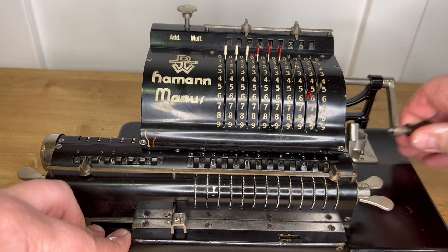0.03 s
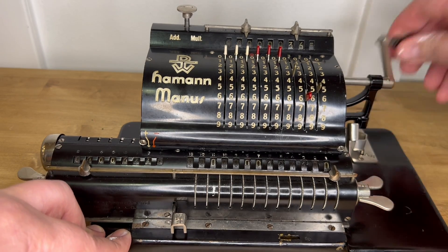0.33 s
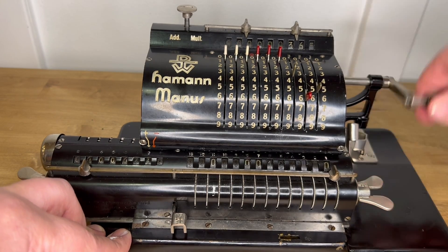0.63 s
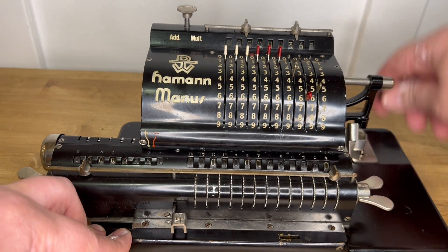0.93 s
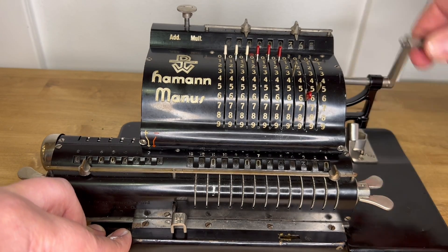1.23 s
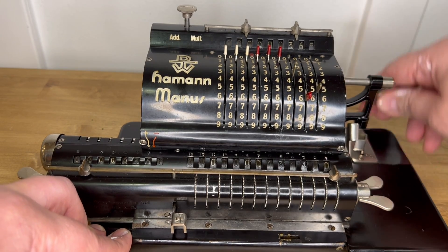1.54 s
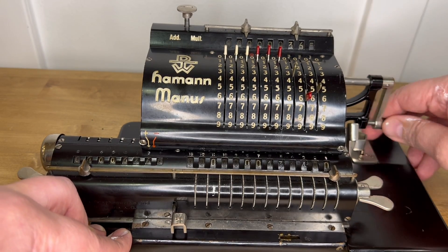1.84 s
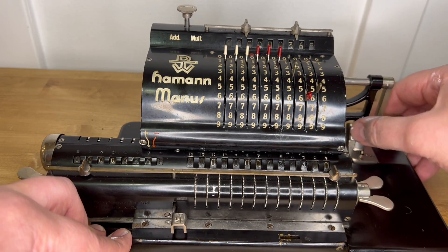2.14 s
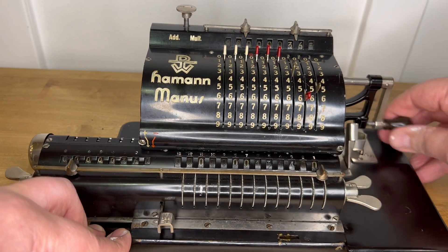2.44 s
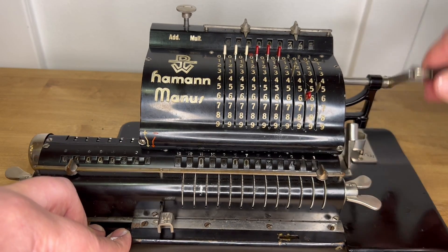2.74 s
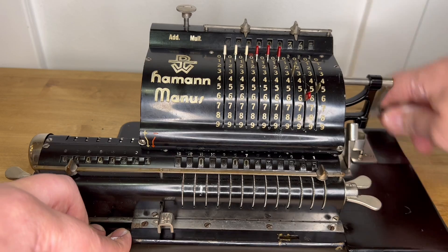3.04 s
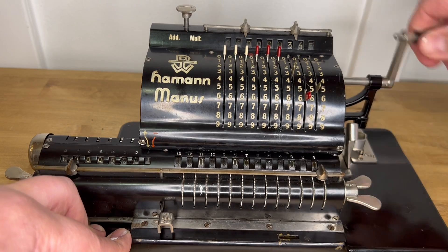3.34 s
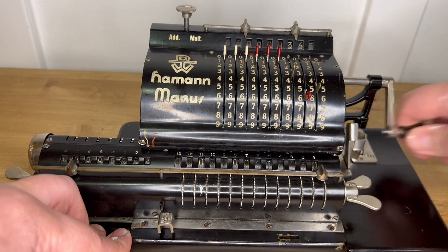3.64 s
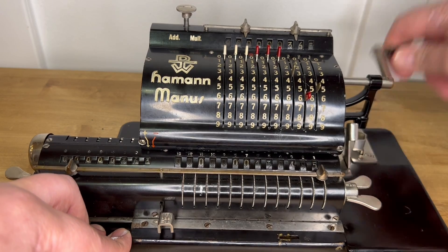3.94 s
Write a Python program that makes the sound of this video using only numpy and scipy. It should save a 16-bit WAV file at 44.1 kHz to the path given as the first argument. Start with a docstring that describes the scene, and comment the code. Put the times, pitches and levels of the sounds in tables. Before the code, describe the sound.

Close up in a small quiet room, a mechanical calculator is cranked three times, gears chattering and case humming. The carriage shifts with a clunk, and three more rattling turns follow, with light ticks and rubs between them.

```python
"""Six rattling turns of a hand-cranked calculator, close by, on a wooden table in a small quiet room.
In each turn the gears chatter, pawls (small catches) snap over the digit wheels and the case hums.
Between turns the crank swings on with a light rub and ticks.
After the third turn the carriage (the sliding part) moves one place and stops with a clunk."""
import sys
import numpy as np
from scipy import signal
from scipy.fft import rfft, irfft, next_fast_len
from scipy.io import wavfile
from scipy.ndimage import uniform_filter1d

SR = 44100
rng = np.random.default_rng(int(sys.argv[2]) if len(sys.argv) > 2 else 0)


def generate_wav(signal):
    """Clip the signal to [-1, 1] and save it as 16-bit WAV at the path in sys.argv[1]."""
    frames = np.transpose(np.atleast_2d(signal))
    scaled = np.clip(frames, -1, 1) * 32767
    pcm = np.round(scaled).astype(np.int16)
    wavfile.write(sys.argv[1], SR, pcm)


N = 176400
T = np.arange(N) / SR

# Levels are relative. A fade_s is the time a sound takes to drop by 60 dB.
# crank turns: start_s, rattle_db, case_push_db, push_length_s, coast_db
TURNS = [(0.122, -39.5, -45.5, 0.18, -45.5), (0.637, -39.5, -40.5, 0.11, -53), (1.13, -39, -40.5, .12, -63),
         (2.685, -40.5, -46.5, 0.13, -48.5), (3.209, -40, -43, 0.21, -52), (3.715, -40.5, -43, 0.09, -61)]
# the tens carry running through the wheels after a turn: start_s, length_s, rattle_db
CARRIES = [(0.258, 0.037, -39), (1.268, 0.035, -38), (3.342, 0.062, -39.5)]
# pawls snapping over the digit wheels: start_s, level_db
PAWL_SNAPS = [(0.122, -32), (0.1396, -33.2), (0.1565, -29.3), (0.1737, -31.0), (0.1887, -30.6),
              (0.2137, -29.7), (0.2358, -29.9), (0.2575, -32), (0.2634, -26.7), (0.2735, -29.1),
              (0.281, -29.8), (0.2959, -25.4), (0.6415, -33), (0.6478, -32.9), (0.6573, -30.6),
              (0.6731, -30.4), (0.7008, -29.9), (0.7225, -30.7), (0.7477, -31.6), (1.1345, -31),
              (1.1399, -29.3), (1.1473, -26.6), (1.1619, -30.5), (1.1956, -30.9), (1.2189, -29.6),
              (1.2404, -28.6), (1.259, -29), (1.2642, -25.9), (1.2729, -26.4), (1.2853, -27.1),
              (1.2966, -28.7), (1.3078, -29.1), (1.3191, -30.0), (2.6857, -32.9), (2.7067, -32.4),
              (2.7271, -33.5), (2.7472, -33.1), (2.765, -30.1), (2.7874, -30.6), (2.812, -32.7),
              (3.2112, -31.5), (3.2182, -30.8), (3.2285, -28.2), (3.246, -28.9), (3.2669, -30.5),
              (3.2863, -27.9), (3.3048, -28.6), (3.3121, -30.6), (3.3273, -30.4), (3.347, -26.9),
              (3.3518, -26.3), (3.3625, -26.8), (3.3749, -24.5), (3.386, -28.3), (3.395, -30),
              (3.4046, -28.6), (3.7185, -33), (3.724, -30.2), (3.7335, -31.2), (3.7485, -31.6),
              (3.7656, -32.1), (3.8069, -31.7), (3.828, -31.4)]
# light ticks of the ratchet and catches: start_s, level_db
RATCHET_TICKS = [(.458, -42), (.5605, -34), (.863, -39), (1.0705, -33.5), (2.2935, -35.5), (2.558, -46),
                 (2.926, -36.5), (3.139, -35), (3.5905, -32), (3.65, -37), (3.932, -43)]
# tones the case rings at: pitch_hz, shaken_db, struck_db, free_fade_s
CASE_TONES = [(128.2, -15.5, -6.5, 0.35), (204.1, -3, -1, 0.37), (236.2, -6.5, 1, 0.13),
              (367.6, -6.5, -0.5, 0.59), (493.6, -22.5, -3.5, 0.23), (575, -11, -7, 0.3),
              (890, -9.5, -15, 0.072), (1053.4, -10.5, -11.5, 0.21), (1204, -18, -5, 0.13),
              (1484.5, -7, -3, 0.068)]
# bright rubs of sliding metal, from the crank swinging free and the carriage starting to slide:
# start_s, level_db, rise_s, fade_s
METAL_RUBS = [(0, -64.5, 0.03, 0.44), (.465, -45, 0.046, 0.2), (.988, -44, 0.042, 0.098),
              (1.648, -45.5, 0.0092, 0.021), (2.202, -44, 0.011, 0.51), (2.592, -62, 0.012, 0.2),
              (3.055, -46, 0.032, 0.22), (3.562, -43, 0.037, 0.13)]
# duller scrapes of the handle: start_s, level_db, rise_s, fade_s
HANDLE_SCRAPES = [(1.652, -46.5, 0.0094, 0.079), (1.739, -51.5, 0.018, 0.15)]
# tones of the free crank arm: pitch_hz, level_db, fade_s
ARM_TONES = [(2090, 0.5, .13), (2288, -10.5, .15)]
# tones of the handle dropping into its seat: pitch_hz, level_db, fade_s
HANDLE_TONES = [(622, 4, 0.066), (886, -3, 0.075), (1530, -3.5, 0.11)]
# the shift lever's soft knock: start_s, level_db, pitch_hz, fade_s
LEVER_KNOCKS = [(2.18, -31.5, 140, 0.024)]
# tone colour (how strong each pitch is) of the steel teeth: pitch_hz, level_db
TEETH_COLOUR = [(40, -26.5), (100, -3), (300, 3), (1450, 0), (1750, -5.5), (2750, 2.5), (3700, -5.5),
                (5200, 0), (10500, -6), (15500, -13)]
# tone colour of the pawls and wheels: pitch_hz, level_db
PAWL_COLOUR = [(150, -13), (1800, -2), (2750, 1.5), (10500, -1), (15500, -8)]
# tone colour of the bright metal rubs: pitch_hz, level_db
RUB_COLOUR = [(60, -20.5), (300, 1), (1300, -5.5), (2100, 0), (3200, -2.5), (11300, -6), (15500, -18)]
# tone colour of the scraping handle: pitch_hz, level_db
SCRAPE_COLOUR = [(150, -15), (620, 11), (1100, -3.5), (1550, -2), (2000, 1), (11000, 1.5), (15500, -10)]
# tone colour of the carriage: pitch_hz, level_db
CARRIAGE_COLOUR = [(40, -56), (90, -3.5), (250, 0), (620, 3.5), (900, -7), (1550, -5.5), (1850, -12.5),
                   (2800, -10), (9000, -17.5), (15500, -37)]
# tone colour of the room's background: pitch_hz, level_db
BACKGROUND_COLOUR = [(25, -28.5), (310, -7.5), (600, -24.5), (3000, -24.5), (15500, -58.5)]
# how long the room echoes: pitch_hz, fade_s
ROOM_FADES = [(100, 0.55), (400, 0.58), (3000, 0.29), (13000, 0.15)]

MESH_S, MESH_RISE_S, MESH_FADE_S = 0.11, 0.0092, 0.08  # the teeth gripping in each turn
SLIDE_START_S, CARRIAGE_STOP_S = 2.218, 2.3128


def gear_rattle():
    """Loose gears take up their slack, then the teeth rattle through each turn and each tens carry."""
    slack_s, slack_db = 0.02, -10
    level = np.zeros(N)
    for start_s, rattle_db, *_ in TURNS:
        t = T - start_s
        slack = amp(slack_db) * ramp(t + slack_s, slack_s) * (t < MESH_RISE_S)
        level += amp(rattle_db) * (slack + pulse(t, MESH_RISE_S, MESH_S, MESH_FADE_S))
    for start_s, length_s, rattle_db in CARRIES:
        level += amp(rattle_db) * pulse(T - start_s, MESH_RISE_S, length_s, MESH_FADE_S)
    return colour(chatter(level, hits_per_s=1500, scatter_db=4.5, fade_s=0.008), TEETH_COLOUR)


def pawls_and_wheels():
    """Pawls snap, the ratchet ticks and the wheels coast after each turn; small steel parts ring along."""
    coasting = sum(amp(db) * fade(T - start_s - MESH_S, 0.79) for start_s, *_, db in TURNS)
    wheels = chatter(coasting, hits_per_s=430, scatter_db=6, fade_s=0.0072)
    snaps = amp(-1) * clicks(PAWL_SNAPS, rise_s=0.00093, hold_s=0.0013, fade_s=0.02, tint_db=2.5)
    ticks = amp(-2) * clicks(RATCHET_TICKS, rise_s=0.0008, hold_s=0.00096, fade_s=0.014, tint_db=3)
    return colour(steel_ring(snaps + ticks + wheels, fade_s=0.026, share=0.27), PAWL_COLOUR)


def case_hum():
    """The gears shake the case with a rough push and the main gear's wavering tone."""
    tooth_hz, waver_hz, tooth_db = 203.6, 7.46, -27.5
    push, tone_level = np.zeros((2, N))
    for start_s, _, push_db, length_s, _ in TURNS:
        t = T - start_s
        push += amp(push_db) * pulse(t, 0.017, length_s, fade_s=0.17)
        tone_level += amp(push_db + tooth_db) * pulse(t, 0.03, length_s, fade_s=0.17)
    pitch_hz = tooth_hz + waver_hz * unit(uniform_filter1d(noise(), size=600))
    tone = np.sin(2 * np.pi * np.cumsum(pitch_hz) / SR)
    return held_case(push * noise() + tone_level * tone)


def held_case(force):
    """The shaken case rings, and the hands on it cut the ringing a little shorter."""
    held_share = 0.76
    return shaken(force, [(hz, db, fade_s * held_share) for hz, db, _, fade_s in CASE_TONES])


def carriage_stop():
    """The carriage hits its stop: loose parts crash and the case rings. Returns the two apart."""
    t = T - CARRIAGE_STOP_S
    blow = amp(-22) * noise() * pulse(t, rise_s=0.0013, hold_s=0.004, fade_s=0.029)
    ring = struck(t, [(hz, db, fade_s) for hz, _, db, fade_s in CASE_TONES])
    return colour(blow, CARRIAGE_COLOUR), amp(-31) * ring * ramp(t, 0.0057)


def carriage_slide():
    """The lever creaks, then the carriage hisses along its rail and shakes the case."""
    lever_start_s = 2.137
    before_stop = T < CARRIAGE_STOP_S
    creak = amp(-61.5) * (T > lever_start_s) * before_stop
    moving = ramp(T - SLIDE_START_S, 0.02) * before_stop
    hiss = colour((creak + amp(-44.5) * moving) * noise(), CARRIAGE_COLOUR)
    return hiss + held_case(amp(-45) * moving * noise())


def lever_knock():
    """The shift lever knocks softly: a low tone that dies after a few cycles."""
    out = np.zeros(N)
    for start_s, db, hz, fade_s in LEVER_KNOCKS:
        t = T - start_s
        out += ramp(t, 1 / hz) * struck(t, [(hz, db, fade_s)])
    return out


def rubs_and_handle():
    """Crank and carriage rub with a faint ring; once, the handle scrapes and knocks into its seat."""
    seat_s = 1.661
    rub = rubbing(METAL_RUBS, RUB_COLOUR, scatter_db=4)
    arm_ring = amp(-27.5) * shaken(rub, ARM_TONES)
    scrape = rubbing(HANDLE_SCRAPES, SCRAPE_COLOUR, scatter_db=1.5)
    knock = amp(-48) * ramp(T - seat_s, 0.0034) * struck(T - seat_s, HANDLE_TONES)
    return rub + arm_ring + scrape + knock


def chatter(level, hits_per_s, scatter_db, fade_s):
    """Teeth meet at random moments, each making a dry click of noise of its own size."""
    hits = random_hits(hits_per_s, scatter_db)
    energy = signal.fftconvolve(hits ** 2, fade(T[:SR // 20], fade_s) ** 2)[:N]
    return level * unit(np.sqrt(np.abs(energy))) * noise()


def clicks(rows, rise_s, hold_s, fade_s, tint_db):
    """Metal taps metal: one burst of noise per row, each with its own random tint of tone colour."""
    out, t = np.zeros(N + SR), T[:SR // 16]
    hz = np.fft.rfftfreq(len(t), 1 / SR)
    for start_s, db in rows:
        tint = rng.standard_normal(28)
        gain = amp(tint_db * np.interp(hz, np.linspace(0, SR / 2, len(tint)), tint))
        burst = unit(irfft(rfft(rng.standard_normal(len(t))) * gain, len(t)))
        out[round(start_s * SR):][:len(t)] += amp(db) * burst * pulse(t, rise_s, hold_s, fade_s)
    return out[:N]


def rubbing(rows, tone_colour, scatter_db):
    """Sliding metal makes thousands of tiny bumps that bite, swell and die away."""
    bite = 0.25  # share of the full rub heard at first touch
    level = np.zeros(N)
    for start_s, db, rise_s, fade_s in rows:
        t = T - start_s
        swell = bite + (1 - bite) * ramp(t, rise_s) ** 2
        level += amp(db) * (t > 0) * swell * fade(np.maximum(t - rise_s, 0), fade_s)
    bumps = unit(random_hits(hits_per_s=7000, scatter_db=scatter_db) * rng.choice([-1, 1], N))
    return colour(steel_ring(level * bumps, fade_s=0.034, share=0.33), tone_colour)


def steel_ring(sound, fade_s, share):
    """Many small steel parts add a short, dense ring, which changes as they move."""
    t, out, step = T[:SR // 8], np.zeros(N + SR), SR // 25
    for start in range(0, N, step):
        tail = rng.standard_normal(len(t)) * fade(t, fade_s)
        ring = signal.fftconvolve(sound[start:start + step], tail / np.linalg.norm(tail))
        out[start:start + len(ring)] += ring
    return np.sqrt(1 - share) * sound + np.sqrt(share) * out[:N]


def shaken(force, tones):
    """A part rings at its own tones while a force keeps shaking it."""
    t, response = T[:SR], np.zeros(SR)
    for k, (hz, db, fade_s) in enumerate(tones):
        ring = (-1) ** k * np.cos(2 * np.pi * hz * t) * fade(t, fade_s)
        response += amp(db) * ring / np.linalg.norm(ring)
    return signal.fftconvolve(force, response)[:N]


def struck(t, tones):
    """A part rings at its own tones after one blow at t = 0."""
    return sum((-1) ** k * amp(db) * np.sin(2 * np.pi * hz * t) * fade(t, fade_s)
               for k, (hz, db, fade_s) in enumerate(tones))


def room_echo(sound):
    """A short, smooth room echo, drawn afresh for each stretch so no pitch rings out."""
    build_up_s = 0.0085
    out, step = np.zeros(N + SR), SR // 14
    for start in range(0, N, step):
        hz, t, bands = signal.stft(rng.standard_normal(SR * 3 // 4), SR, nperseg=256)
        bands *= fade(t, value_at(ROOM_FADES, hz)[:, None])  # high pitches die sooner
        tail = signal.istft(bands, SR, nperseg=256)[1]
        tail *= ramp(T[:len(tail)], build_up_s)
        echo = signal.fftconvolve(sound[start:start + step], tail / np.linalg.norm(tail))
        out[start:start + len(echo)] += echo
    return out[:N]


def background():
    """The quiet room has a faint, low, steady hush."""
    return amp(-78) * colour(noise(), BACKGROUND_COLOUR)


def amp(db):
    """Turn decibels into a number to multiply by."""
    return 10 ** (np.asarray(db) / 20)


def unit(sound):
    """Scale a sound to an average power of 1."""
    return sound / np.sqrt(np.mean(sound ** 2) + 1e-20)


def value_at(points, hz):
    """Read between the rows of a (pitch_hz, value) table, with octaves evenly spaced."""
    pitches, values = np.transpose(points)
    return np.interp(np.log(hz + 1), np.log(pitches + 1), values)


def fade(t, fade_s):
    """Start at t = 0 and drop by 60 dB every fade_s."""
    return (t >= 0) * amp(-60 * np.maximum(t, 0) / fade_s)


def ramp(t, rise_s):
    """A straight rise from 0 to 1."""
    return np.clip(t / rise_s, 0, 1)


def pulse(t, rise_s, hold_s, fade_s):
    """Rise, hold until t = hold_s, then fade."""
    return ramp(t, rise_s) * fade(np.maximum(t - hold_s, 0), fade_s)


def noise():
    """Fresh white noise: an even hiss."""
    return rng.standard_normal(N)


def random_hits(hits_per_s, scatter_db):
    """Tiny hits of uneven size at random moments."""
    return (rng.random(N) < hits_per_s / SR) * amp(scatter_db * np.clip(noise(), -2, 2))


def colour(sound, tone_colour):
    """Filter a sound to give it a tone colour; white noise keeps its power."""
    size = 8192
    gain = amp(value_at(tone_colour, np.fft.rfftfreq(size, 1 / SR)))
    # fold the filter forward in time, so nothing rings before a hit
    folded = irfft(np.log(gain))
    folded[1:size // 2] *= 2
    folded[size // 2 + 1:] = 0
    response = irfft(np.exp(rfft(folded)))
    return signal.fftconvolve(sound, response / np.linalg.norm(response))[:N]


def scene():
    """Mix the machine, the room's echo and the background into one channel."""
    machine = gear_rattle() + pawls_and_wheels() + carriage_slide() + lever_knock() + rubs_and_handle()
    crash, case_ring = carriage_stop()
    echo = room_echo(amp(-9.5) * machine + amp(-10) * crash)
    return (machine + case_hum() + crash + case_ring + echo + background())[None]


def record(dry):
    """Cut away the very highest pitches steeply."""
    top_hz = 15950
    size = next_fast_len(N + SR // 2)
    hz = np.fft.rfftfreq(size, 1 / SR)
    return irfft(rfft(dry, size) / np.sqrt(1 + (hz / top_hz) ** 200), size)[..., :N]


dry = scene()
out = record(dry)
generate_wav(out)
```